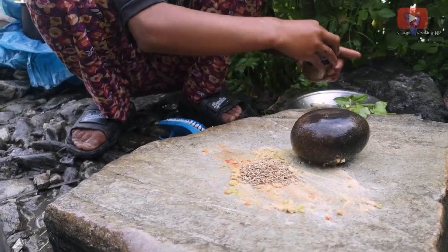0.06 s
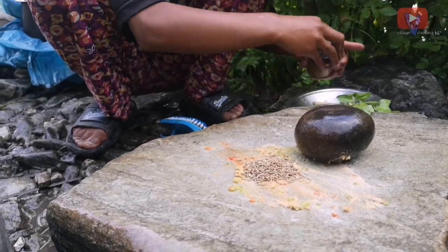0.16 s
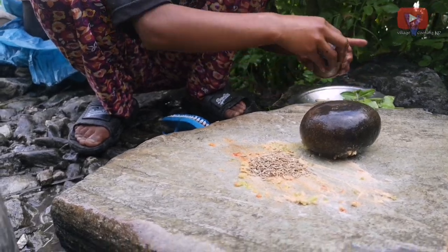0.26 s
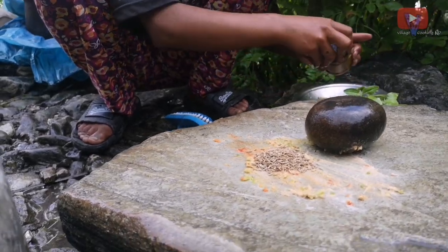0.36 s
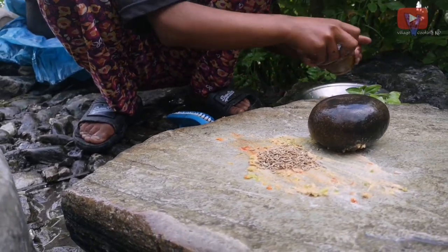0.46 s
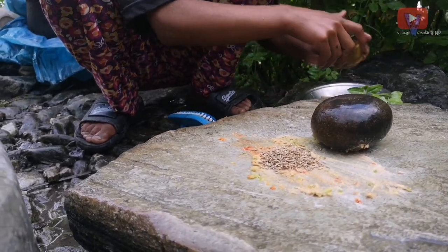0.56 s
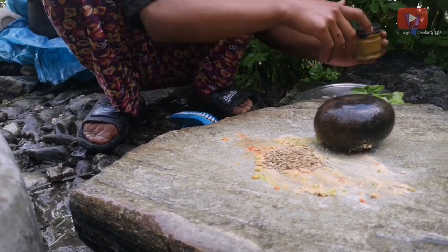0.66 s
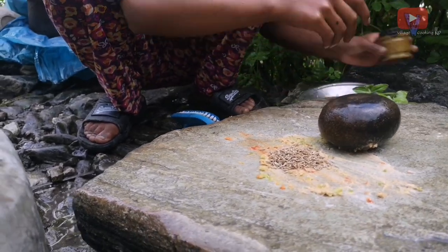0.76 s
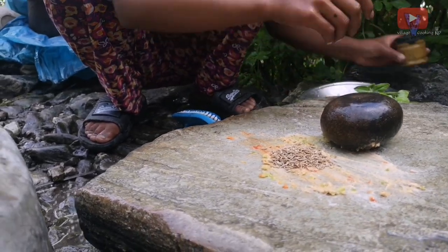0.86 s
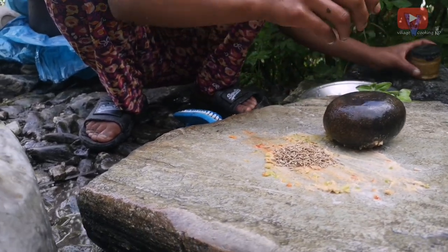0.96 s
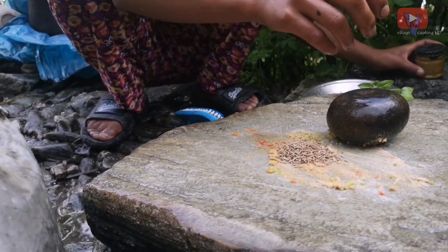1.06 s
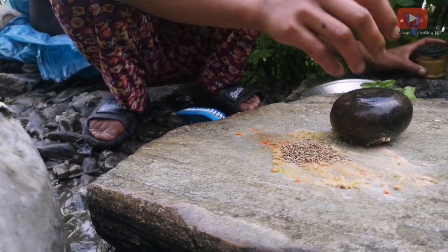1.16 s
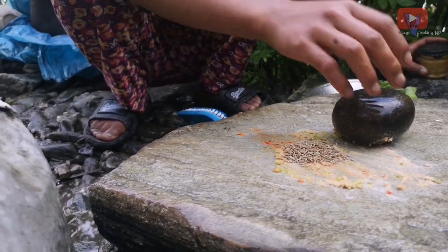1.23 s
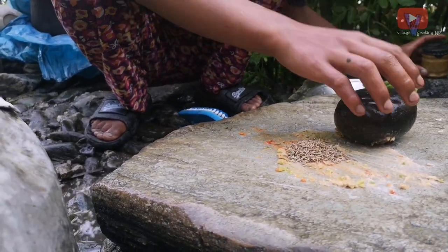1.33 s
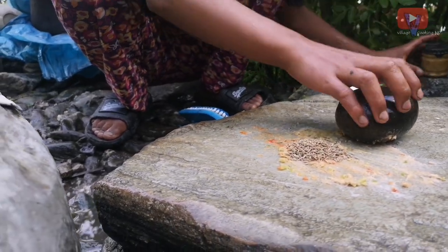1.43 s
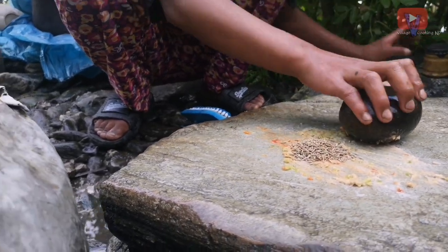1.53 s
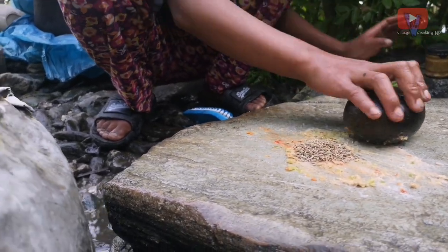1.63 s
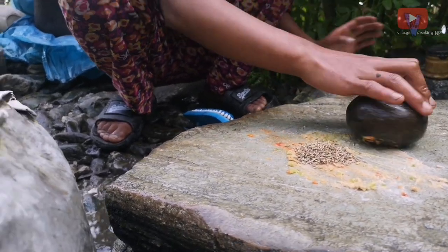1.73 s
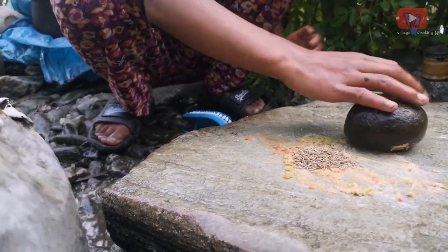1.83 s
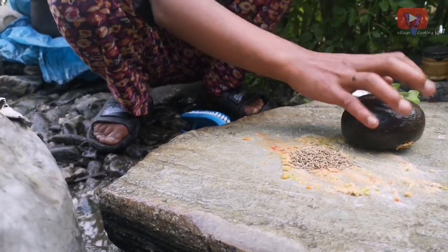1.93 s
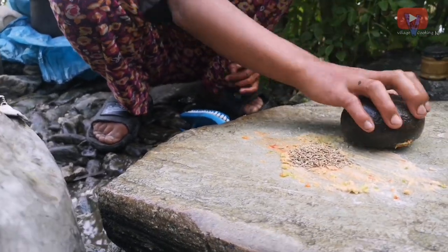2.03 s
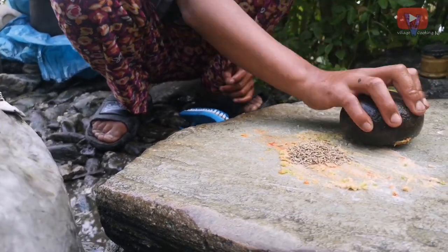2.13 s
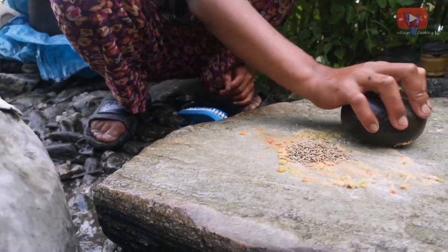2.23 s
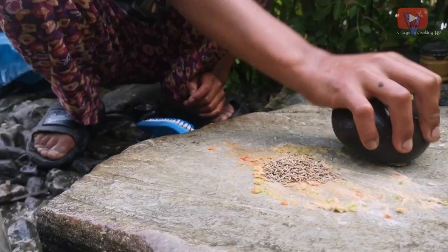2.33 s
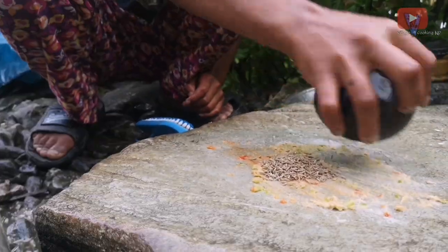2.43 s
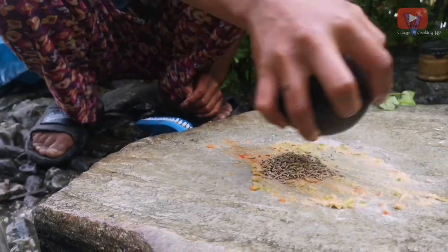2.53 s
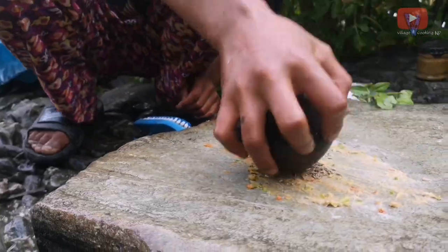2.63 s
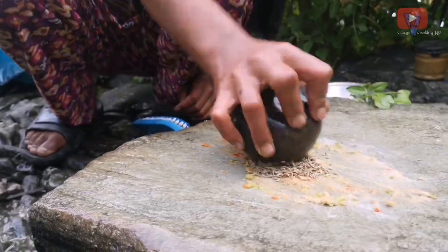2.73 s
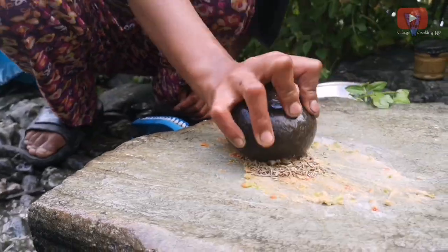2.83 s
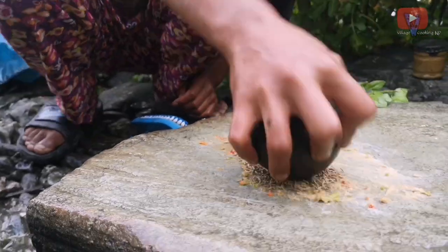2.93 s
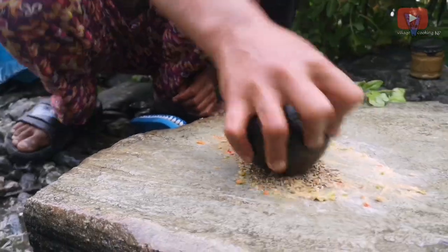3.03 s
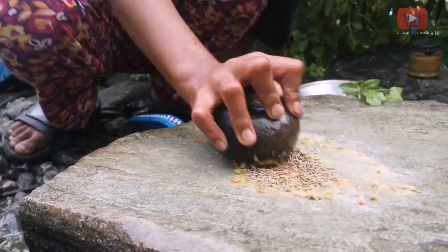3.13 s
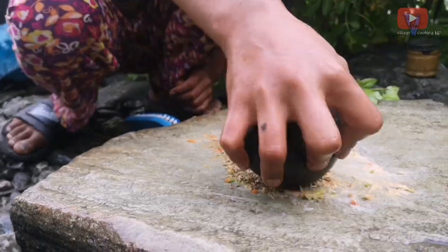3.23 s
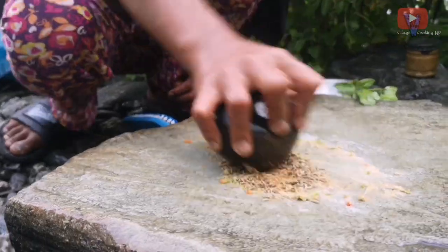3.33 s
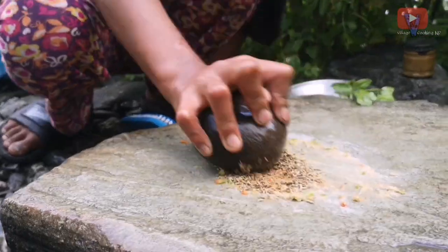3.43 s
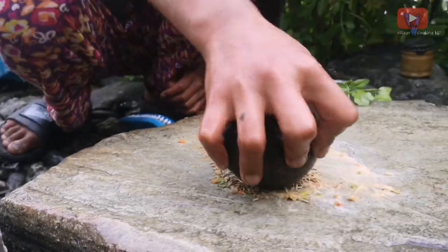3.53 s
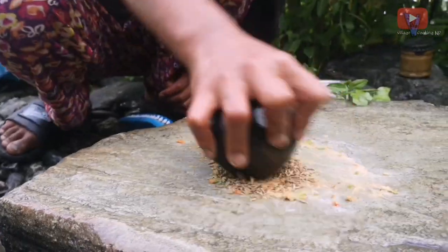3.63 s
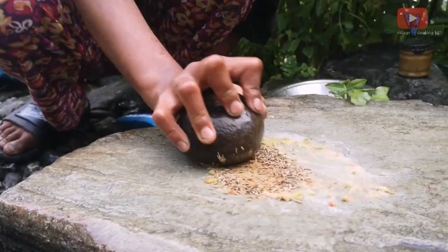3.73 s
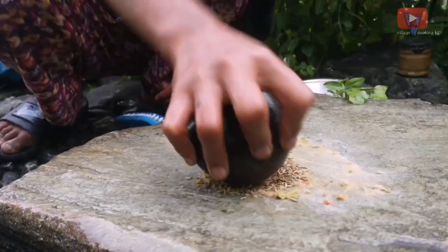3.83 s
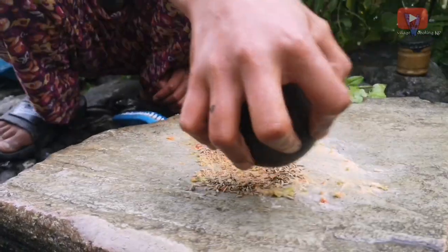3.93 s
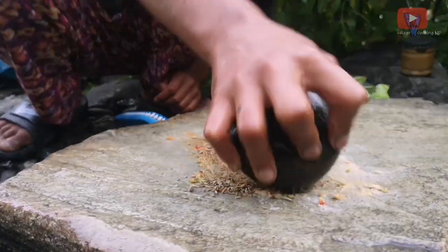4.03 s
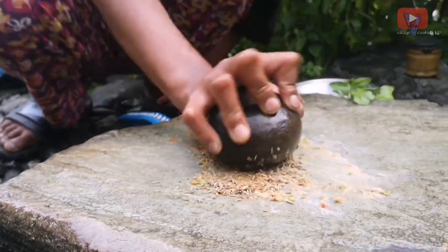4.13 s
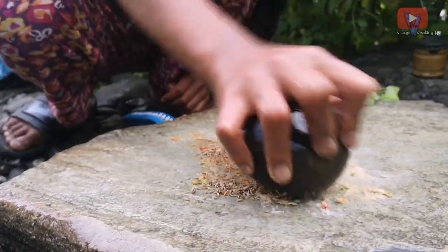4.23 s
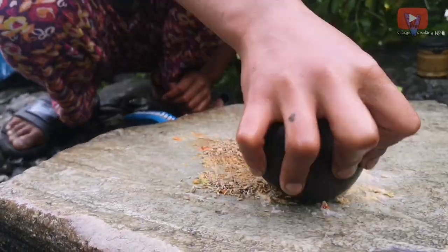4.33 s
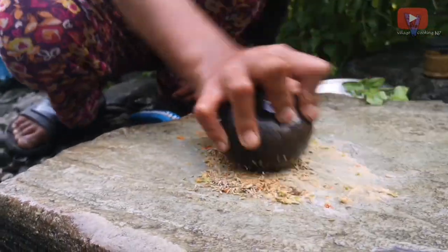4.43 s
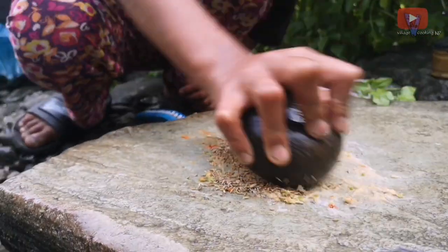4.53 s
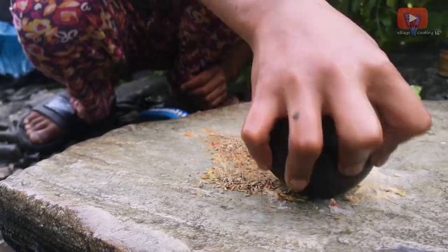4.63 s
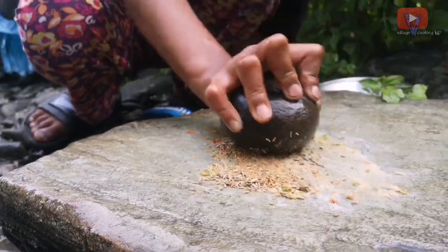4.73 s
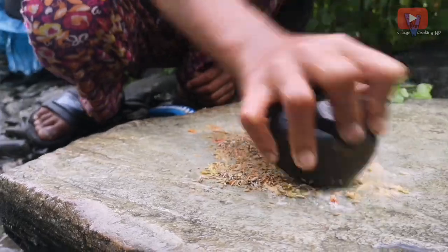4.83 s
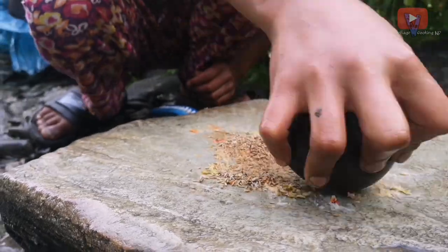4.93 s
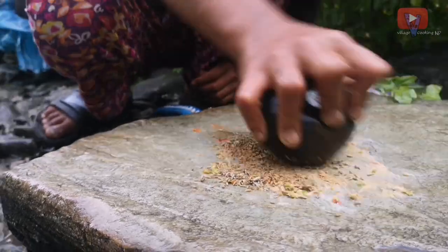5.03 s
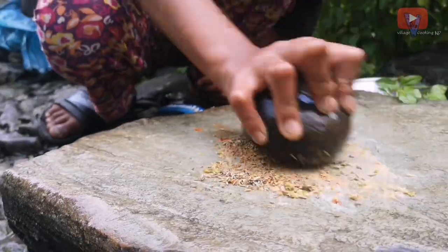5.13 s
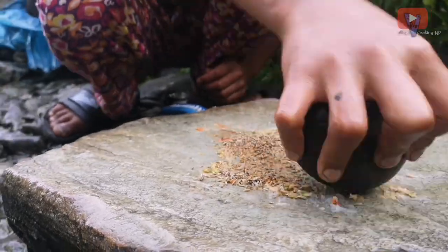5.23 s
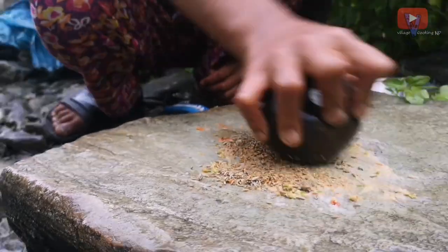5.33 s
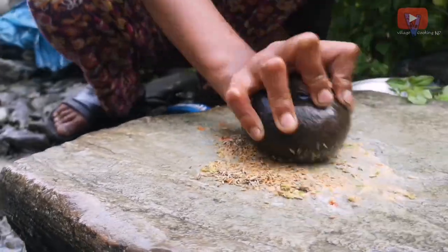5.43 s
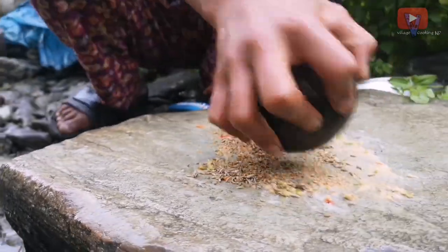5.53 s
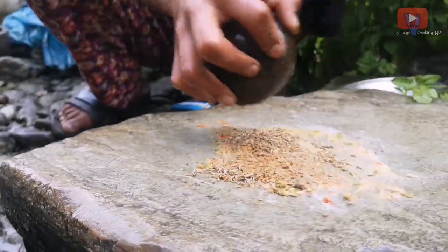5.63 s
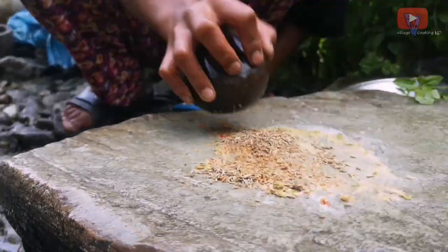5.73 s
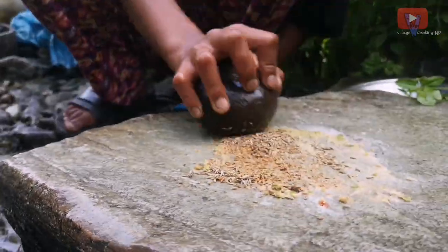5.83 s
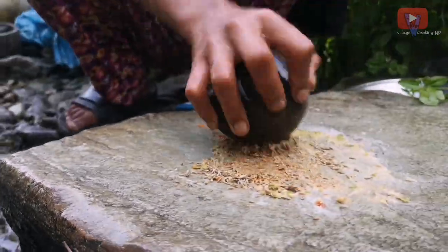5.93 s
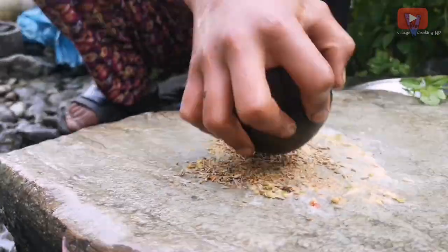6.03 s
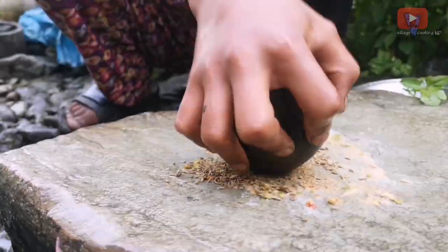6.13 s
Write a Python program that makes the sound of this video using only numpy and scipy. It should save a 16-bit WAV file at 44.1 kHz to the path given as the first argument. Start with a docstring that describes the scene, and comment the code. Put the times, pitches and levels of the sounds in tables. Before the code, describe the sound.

A round stone scrapes back and forth over spices on a stone slab, crunching and thudding, after small knocks and a clucking hen outdoors.

```python
"""Small things knock and a hen clucks in an open yard. After a soft rub of the hand, a round stone scrapes
to and fro over spices on a stone slab, close to a two-port microphone. Grit breaks in a treble fizz,
seeds crack, the rough faces make the slab rumble, and the stone lands with a ringing thud a few times.
Scuffs rasp off to the right; a far dove, a chick, insects and low wind fill the background."""
import sys
import numpy as np
from scipy import signal
from scipy.io import wavfile
from scipy.ndimage import uniform_filter1d

SR = 44100
rng = np.random.default_rng(int(sys.argv[2]) if len(sys.argv) > 2 else 0)


def store_pcm(level_fs):
    """Save levels as 16-bit WAV."""
    pcm = np.round(np.clip(level_fs, -1, 1) * 32767).astype(np.int16)
    wavfile.write(sys.argv[1], SR, np.atleast_2d(pcm).T)


N = 272097

# strokes of the stone: (start [s], stop [s], grit level [dB], crest [share of stroke], rumble offset [dB])
STROKES = [(2.703, 2.736, -39, 0.25, -14), (2.74, 2.903, -38.5, 0.18, -14), (2.865, 2.952, -28, 0.24, -59),
           (3.067, 3.147, -34.5, 0.26, -37), (3.159, 3.265, -27, 0.45, -27),
           (3.358, 3.46, -30, 0.21, -25.5), (3.472, 3.584, -28, 0.45, -25), (3.643, 3.746, -30, 0.33, -28),
           (3.763, 3.868, -27, 0.43, -25), (4.103, 4.201, -24.5, 0.53, -35), (4.2, 4.331, -24, 0.54, -22.5),
           (4.411, 4.52, -24.5, 0.43, -29.5), (4.514, 4.626, -25.5, 0.38, -20),
           (4.687, 4.822, -27.5, .55, -29.5), (4.824, 4.937, -24.5, 0.37, -21),
           (5.011, 5.14, -31.5, 0.52, -24.5), (5.139, 5.256, -28.5, 0.42, -19),
           (5.325, 5.466, -33.5, 0.28, -21), (5.447, 5.569, -28.5, 0.32, -33),
           (5.805, 5.988, -33.5, 0.74, -29), (6.094, 6.192, -38.5, 0.63, -14)]
# flat strokes at first, then peaked: (time [s], power on the speed [exponent])
STROKE_POINTEDNESS = [(3.0, 0.063), (3.8, 0.69), (4.3, 2.9), (5.1, 1.18)]
def pressure(rumble_share=0, lag_s=0, evenness=1):
    """Envelope of the grinding: grit bites once the stone is fast enough, and trickles on after it."""
    bite_speed, steepness, floor = 0.7, 2.44, 0.06  # speed as a share of the top speed
    level = np.zeros(N)
    for start, stop, db, crest, rumble_db in STROKES:
        speed = swell(start + lag_s, stop + lag_s, crest, 0.72)
        bite = floor + speed ** steepness / (speed ** steepness + bite_speed ** steepness)
        shape = bite * speed ** np.interp(start, *np.transpose(STROKE_POINTEDNESS))
        level += amp(db + rumble_share * rumble_db) * shape ** evenness
    decay = np.exp(-1 / (0.013 * SR))  # 13 ms trickle
    return level + amp(-16.5) * signal.lfilter([1 - decay], [1, -decay], level)


# tone of the grit: (frequency [Hz], relative gain [dB])
GRIT_EQ = [(1500, -24), (2500, -26.5), (3200, -23.5), (4450, -13), (5800, -12), (6720, -5.5), (9370, 3.5),
           (14600, -6.5), (15600, -9)]
# how the two ports colour the grit: (frequency [Hz], left over right [dB])
PORT_TILT = [(1500, -5.5), (4500, -7), (7500, -7.5), (9200, 7), (12000, 18), (15000, -6.5)]
# travel of the stone: (time [s], left over right [dB])
STONE_PAN = [(2.8, 0), (3.2, 8.5), (3.8, 9.5), (4.5, 6.5), (5.3, 4), (6.101, 0)]
# seeds splitting with a sharp snap: (time [s], level before panning and EQ [dB])
SEED_SNAPS = [(2.967, -45), (3.371, -30.5), (3.56, -38), (4.143, -33), (4.26, -29), (4.274, -44),
              (4.285, -45), (4.291, -30.5), (4.862, -31.5), (5.21, -39), (5.362, -39), (5.475, -40)]
def grit():
    """Grit breaks in clumps under the stone; each port hears its own colour, partly by other paths."""
    hz = np.fft.rfftfreq(1024, 1 / SR)
    pan_db = np.interp(np.arange(N) / SR, *np.transpose(STONE_PAN))
    clumps = amp(0.28 * wander(120) + wander(700))  # the push catches and slips
    shared = unit_rms(grains(9000, 2.1) + 0.54 * grains(600, 0.48))  # fine grit, coarser seed coats
    snaps, level = np.zeros(N), pressure()
    for s, db in SEED_SNAPS:
        split = unit_rms(rng.standard_normal(120) * signal.windows.hann(120))
        add(snaps[None], s, amp(db) * split)
    crumbs = 0.061 * uniform_filter1d(level, 9000)  # loose crumbs keep rolling between strokes
    ports = []
    for side in (1, -1):  # left, right
        fizz = 0.68 * shared + 0.62 * grains(10000, 1.8)
        fizz *= (level * clumps + crumbs) * amp(side * pan_db / 2)
        taps = eq_taps(curve(GRIT_EQ, hz) + np.minimum(side * curve(PORT_TILT, hz), 0))
        ports.append(signal.oaconvolve(fizz + amp(side * 13) * snaps, taps)[:N])
    return patchy(np.array(ports), patch_db=2)  # the colour wanders as other seeds come under the stone


# ring of cracking seeds: (frequency [Hz], width [Hz], gain [dB])
SEED_MODES = [(3290, 340, 1.5), (4410, 93, -4), (6100, 200, 12)]
def seeds():
    """Whole seeds crack one by one and ring briefly in resonances that shift with the stone."""
    shift = 1 + 0.12 * wander(1500)
    shared, own = (ring_modes(grains(500, 5.5), SEED_MODES, shift) for path in range(2))
    return amp(-19.5) * pressure() * np.array([shared, 0.48 * shared + 0.89 * own])


# body of the slab: (frequency [Hz], width [Hz], gain [dB])
SLAB_MODES = [(83, 51, 8), (129, 45, -0.5), (350.6, 120, 6), (621, 235, -2.5), (890, 265, -13.5)]
def slab_rumble():
    """The rough faces bump and shake the heavy slab, which answers a little late."""
    shift = 1 + 0.042 * wander(3000)  # the ring shifts as the stone moves over the slab
    shared, left, right = (ring_modes(grains(500, 3.8), SLAB_MODES, shift) for path in range(3))
    level = pressure(rumble_share=0.97, lag_s=0.0087, evenness=0.64)
    return (shared + 0.29 * np.array([left, right])) * level * pan(-2.4)


def spice_shuffle():
    """Heaped spices are pushed about: a duller scrape that lingers between the strokes."""
    scrape = np.array([resonate(grains(2800, 21.0), hz=1780, width=5600) for port in range(2)])
    return amp(-34.5) * uniform_filter1d(pressure(), 7000) * unit_rms(scrape)


# ring of the hand stone: (frequency [Hz], width [Hz], gain [dB])
STONE_MODES = [(353, 120, 7), (640, 290, 6.5), (1077, 310, 2.5), (2690, 110, -11), (3580, 170, -12.5)]
# stone hits slab: (time [s], level [dB], tick offset [dB], hardness [dB/octave], thud offset [dB])
LANDINGS = [(4.073, -26, -13, 0.5, 11), (5.864, -22.5, -19, -1.5, 6), (6.153, -31.5, -11, -15, 9)]
def stone_landings():
    """Grit ticks as the stone meets the spices; 3 ms later the blow rings the stone and thuds the slab."""
    out, blow = np.zeros((2, N)), signal.unit_impulse(5000, 130)
    t = np.arange(len(blow)) / SR
    for s, db, tick_db, hardness, thud_db in LANDINGS:
        body = amp(thud_db) * unit_rms(steep_band(blow, hz=107, width=104))
        for k, (hz, width, mode_db) in enumerate(STONE_MODES):
            gain = (-1) ** k * amp(mode_db + hardness * np.log2(hz / 370))
            body += gain * unit_rms(steep_band(blow, hz, width))
        tick = np.diff(rng.standard_normal((2, len(t) + 1))) * amp(tick_db - 60 * t / 0.041)
        add(out, s, amp(db) * (body / abs(body).max() + 2.6 * tick), pan_db=-3.5)
    return out


def stone_skid():
    """The stone drags as it lifts: grit excites its two high modes, which rise and sink a little."""
    drag = dict(start=5.6, stop=5.72, crest=0.3)
    shift = 1 + 0.037 * (swell(**drag, pointedness=0.83) - 0.5)
    ring = np.array([ring_modes(grains(620, 1.6), STONE_MODES[-2:], shift) for port in range(2)])
    return amp(-58) * swell(**drag, pointedness=0.21) * ring


# knocks and ticks: (time [s], level [dB], pitch [Hz], second tone [ratio], treble offset [dB],
# decay to -60 dB [s], hollowness [0-1])
KNOCKS = [(.129, -20, 877, 1.85, -1.5, 0.025, 0.78), (0.147, -42.5, 720, 1.74, 4.5, 0.14, 0.27),
          (0.209, -43.5, 508, 1.75, -2, 0.18, 0.25), (0.229, -35, 850, 1.8, -0.5, 0.053, 0.35),
          (.25, -30.5, 444, 2, -0.5, 0.043, 0.15), (0.486, -37, 1340, 0.18, -20, 0.022, 0.2),
          (0.545, -40.5, 1240, 2.2, 7.5, 0.035, 0.13), (0.715, -53.5, 1820, 1.5, -15, 0.16, 0),
          (.736, -37, 1215, 1.37, -24, 0.029, 0.22), (1.104, -51.5, 1310, 1.66, 3.5, 0.14, 0.1),
          (1.174, -20.5, 580, 1.56, 4.5, 0.032, 0.37), (1.19, -34, 584, 1.9, -1, 0.054, 0.17),
          (2.576, -58, 2400, 1.7, 20, 0.032, 0.8), (2.703, -42.5, 253, 1.54, -30, 0.13, 0.74),
          (2.965, -41, 2870, 1.4, -15, 0.018, 0.6), (5.604, -29, 795, 0.34, -22, 0.024, 0.47)]
# treble clack of the knocks: (frequency [Hz], width [Hz], gain [dB])
CLACK_MODES = [(4600, 1850, -0.5), (6610, 1420, 5), (8000, 4700, 8.5), (9540, 90, -2.5), (11000, 610, -9)]
def knocks():
    """Hollow things ring in two tones, dry ones clatter; a tick sits on top and crumbs scatter after."""
    out, t = np.zeros((2, N)), np.arange(4000) / SR
    attack = np.minimum(t / 0.0018, 1)
    for s, db, hz, ratio, treble_db, t60, hollow in KNOCKS:
        noise, left, right = rng.standard_normal((3, len(t)))
        first_tone = np.sin(2 * np.pi * hz * t) * np.tanh(t / 0.0054)
        second_tone = 0.5 * np.sin(2 * np.pi * ratio * hz * t) * amp(-40 * t / t60)
        modes = [(hz, 0.92 * hz, 0), (ratio * hz, 0.94 * hz, -2),
                 (2.5 * hz, 1.2 * hz, -6), (3.74 * hz, hz, -12)]
        clatter = ring_modes(noise, modes)
        body = 2 * hollow * (first_tone + second_tone) + 0.81 * (1 - hollow) * clatter
        clack = ring_modes(np.array([left, 0.01 * left + 0.46 * right]), CLACK_MODES)
        tick = amp(treble_db - 30 * t / t60) * clack
        hit = (body + tick) * attack * amp(-60 * t / t60)
        scatter = amp(treble_db - 16 - 60 * t / 0.14) * clack[:, ::-1]
        add(out, s, amp(db) * (hit + scatter), pan_db=-5.5)
    return out


# rough scuffs: (start [s], length [s], rasp level [dB], thump level [dB], thump pitch [Hz],
# ground boom over thump [dB], gravel tuning [ratio], fall of that tuning [share])
SCUFFS = [(2.715, 0.15, -41.5, -46, 250, 2, 0.97, 0.15), (2.963, 0.1, -57, -79, 290, -2, 1.2, 0.094),
          (5.294, 0.34, -44.5, -55.5, 368, -23, 1.047, 0.03),
          (5.546, 0.25, -59.5, -68, 390, -9, 0.69, 0.11), (6.112, 0.074, -51.5, -40, 160, -25, 0.98, 0.11)]
# rasp of gravel: (frequency [Hz], width [Hz], gain [dB])
GRAVEL_MODES = [(543, 113, 9.5), (1030, 265, 9), (1620, 290, 8), (1940, 380, 13), (2565, 390, 9),
                (3940, 480, 5)]
def scuffs():
    """As of feet shifting on gravel: a low thump first, then a rasp with sinking resonances."""
    start, length, rasp_db, thump_db, thump_hz, boom_db, tuning, fall = np.transpose(SCUFFS)
    t = np.arange(N) / SR
    now = np.clip(np.searchsorted(start, t) - 1, 0, None)  # the latest scuff at each sample
    progress = np.clip((t - start[now]) / length[now], 0, 1)
    shift = tuning[now] * (1 + fall[now] * (0.5 - progress)) * (1 + 0.037 * wander(900))
    rasp_level = sum(amp(db) * swell(s + 0.099 * span, s + span, 0.54, 0.76)
                     for s, span, db in zip(start, length, rasp_db))
    thump_level = sum(amp(db) * swell(s, s + span, 0.11, 0.73)
                      for s, span, db in zip(start, length, thump_db))
    bumps = grains(700, 1.5)
    thump = unit_rms(resonate(resonate(bumps, thump_hz[now], 200), thump_hz[now], 135))
    boom = amp(boom_db[now]) * unit_rms(resonate(resonate(bumps, 59, 69), 67, 68))
    shared, left, right = (ring_modes(grains(4000, 0.62), GRAVEL_MODES, shift) for path in range(3))
    rasp = 0.98 * shared + 0.81 * np.array([left, right])
    return (rasp_level * rasp + thump_level * (thump + boom)) * pan(-3)


# rubs of the hand: (start [s], stop [s], level [dB], crest [share of rub], pointedness [exponent],
# centre [Hz], width [Hz])
HAND_RUBS = [(1.81, 2.177, -59.5, 0.35, 0.33, 12700, 3000), (1.843, 2.17, -50, 0.48, 2.6, 7840, 3900)]
def hand_rub():
    """Soft bright friction of the hand on the stone."""
    out = np.zeros((2, N))
    for start, stop, db, crest, pointedness, hz, width in HAND_RUBS:
        fizz = np.array([steep_band(grains(8500, 4.0), hz, width) for port in range(2)])
        out += amp(db) * swell(start, stop, crest, pointedness) * unit_rms(fizz)
    return out * pan(5)


# clucks, low notes leading into higher ones: (time [s], level [dB], pitch [Hz])
CLUCKS = [(0.529, -42, 335), (0.57, -44.5, 427), (0.943, -42, 380), (0.972, -48, 423), (1.347, -47, 443),
          (1.672, -49, 303), (1.707, -39, 430), (2, -45, 333), (2.064, -48, 278), (2.105, -37, 430.6)]
def hen():
    """A jittery buzz and pulsing breath make short hoarse notes through a throat near 870 Hz."""
    out, t = np.zeros((2, N)), np.arange(6000) / SR
    envelope = np.minimum(t / 0.015, 1) * amp(-60 * t / 0.15)
    for s, db, hz in CLUCKS:
        jitter, breath = rng.standard_normal((2, len(t)))
        phase = 2 * np.pi * np.cumsum(hz * (1 + 0.38 * uniform_filter1d(jitter, 150))) / SR
        buzz = unit_rms(sum(np.sin(k * phase) for k in range(1, 5)))
        voice = buzz + 2.4 * breath * (1 + np.cos(phase))
        throat = resonate(resonate(voice, 760, 440), 865, 170)
        note = unit_rms(throat + 0.42 * resonate(voice, hz, 210))
        add(out, s, amp(db) * envelope * note, pan_db=-3)
    return out


# coos: (time [s], level [dB])
COOS = [(.12, -72), (1.04, -70), (2.03, -68), (2.8, -72), (3.8, -69)]
def dove():
    """A far dove whistles notes whose pitch arches over a 1340 Hz crest."""
    out = np.zeros((2, N))
    arch_hz = 1340 - 620 * (np.linspace(0, 1, round(0.31 * SR)) - 0.4) ** 2
    for s, db in COOS:
        add(out, s, whistle(arch_hz, db, jitter=0.0055))
    return out


# peeps: (time [s], length [s], level [dB])
PEEPS = [(.008, .11, -57), (1.27, .07, -66), (4.995, .045, -63)]
def chick():
    """A chick whistles thin falling peeps."""
    out = np.zeros((2, N))
    for s, length, db in PEEPS:
        fall_hz = np.linspace(4400, 3500, round(length * SR))
        add(out, s, whistle(fall_hz, db, jitter=0.02))
    return out


# insect voices: (centre [Hz], width [Hz], starting level [dB])
INSECT_BANDS = [(6100, 360, -63.5), (7570, 140, -66.5), (11600, 30, -76)]
def insects():
    """A far chorus: fuzzy bands that waver slightly and grow by 0.1 dB a second."""
    out, rise_db = np.zeros((2, N)), 0.1 * np.arange(N) / SR
    for hz, width, db in INSECT_BANDS:
        level = amp(db + 0.22 * wander(9000) + rise_db)
        out += level * unit_rms(steep_band(rng.standard_normal((2, N)), hz, width))
    return out


# tone of the outdoor bed: (frequency [Hz], relative gain [dB])
YARD_EQ = [(20, -10), (62, 0), (113, -11.5), (181, -12), (493, -18.5), (651, -24), (885, -21),
           (1170, -26.5), (6580, -23), (7560, -16), (11500, -32.5), (15600, -34.5)]
# its stereo width: (frequency [Hz], left-right correlation [-1 to 1])
YARD_CORRELATION = [(60, 1), (380, 0.66), (2380, -0.27), (15000, 0.15)]
# its balance: (frequency [Hz], left over right [dB])
YARD_PAN = [(60, 0), (380, -2.5), (2380, -2), (15000, 5.5)]
def yard_air():
    """Low murmur of wind and far hiss, with drifting louder and softer patches."""
    frames, hz = N // 256 + 5, np.fft.rfftfreq(1024, 1 / SR)
    left_re, left_im, own_re, own_im, patches = rng.standard_normal((frames, 513, 5)).T
    patches = unit_rms(uniform_filter1d(uniform_filter1d(patches, 12, 0, mode="wrap"), 14, 1))
    likeness = curve(YARD_CORRELATION, hz)[:, None]
    lean = amp(curve(YARD_PAN, hz)[:, None] / 2)
    left = left_re + 1j * left_im
    right = likeness * left + np.sqrt(1 - likeness ** 2) * (own_re + 1j * own_im)
    spectrum = np.array([left * lean, right / lean]) * amp(curve(YARD_EQ, hz)[:, None] + 2.4 * patches)
    return amp(-54) * unit_rms(signal.istft(spectrum, nperseg=1024, noverlap=768)[1][:, :N])


def whistle(hz, db, jitter):
    """A near-sine note that wavers with distance."""
    waver = 1 + 0.5 * wander(500, (2, len(hz)))
    phase = 2 * np.pi * np.cumsum(hz * (1 + jitter * wander(200, len(hz)))) / SR
    note = np.sin(phase + np.array([[0], [1.3]]))
    return amp(db) * note * waver * signal.windows.tukey(len(hz), 0.4)


def swell(start, stop, crest, pointedness):
    """Envelope of one movement: speed rises from rest, crests and returns to rest."""
    progress = np.clip((np.arange(N) / SR - start) / (stop - start), 0, 1)
    skew = np.log(0.5) / np.log(crest)
    return np.sin(np.pi * progress ** skew).clip(0) ** pointedness


def grains(per_s, spread_db):
    """Random clicks of either sign, a few of them large."""
    size = amp(spread_db * np.minimum(rng.exponential(1, N), 5)) * rng.choice([-1., 1.], N)
    return unit_rms(size * (rng.random(N) < per_s / SR))


def wander(samples, shape=N):
    """Random drift, smoothed over this many samples."""
    return unit_rms(uniform_filter1d(rng.standard_normal(shape), samples))


def patchy(x, patch_db):
    """Raises or lowers random patches of about 1.5 kHz by 25 ms."""
    spectrum = signal.stft(x, nperseg=256, noverlap=192)[2]
    field = rng.standard_normal(spectrum.shape[:0:-1]).T
    field = unit_rms(uniform_filter1d(uniform_filter1d(field, size=9, axis=0), size=17, axis=1))
    return signal.istft(spectrum * amp(patch_db * field), nperseg=256, noverlap=192)[1][:, :N]


def resonate(x, hz, width):
    """A resonance that can glide: shifts hz down to zero, smooths, and shifts back."""
    carrier = np.exp(2j * np.pi * np.cumsum(hz * np.ones(x.shape[-1])) / SR)
    pole = np.exp(-np.pi * width / SR)
    return 2 * (carrier * signal.lfilter([1 - pole], [1, -pole], x / carrier)).real


def steep_band(x, hz, width):
    return resonate(resonate(x, hz, width), hz, width)


def ring_modes(x, modes, shift=1):
    """A bank of steep resonances, all tuned by one factor."""
    return unit_rms(sum(amp(db) * steep_band(x, hz * shift, width) for hz, width, db in modes))


def eq_taps(db):
    """Causal filter of energy 1, shaped by the gains db on an rfft grid."""
    log_gain = np.log(amp(np.r_[db, db[-2:0:-1]]))
    taps = np.fft.ifft(np.exp(np.conj(signal.hilbert(log_gain)))).real[:len(db)]
    return taps / np.linalg.norm(taps)


def curve(points, hz):
    """Interpolates a table along log frequency."""
    point_hz, value = np.transpose(points)
    return np.interp(np.log(hz + 1), np.log(point_hz + 1), value)


def add(mix, s, sound, pan_db=0):
    """Mixes a sound in at s seconds."""
    part = mix[:, round(s * SR):][:, :np.shape(sound)[-1]]
    part += (sound * pan(pan_db))[:len(mix), :part.shape[1]]


def pan(left_over_right_db):
    return amp([[left_over_right_db / 2], [-left_over_right_db / 2]])


def amp(db):
    return 10 ** (np.asarray(db) / 20)


def unit_rms(x):
    return x / np.sqrt(np.mean(x ** 2) + 1e-20)


def scene():
    """The grinding and the yard around it, in stereo."""
    off_right = scuffs() + hen()
    off_right[0] = np.r_[np.zeros(17), off_right[0, :-17]]  # these reach the left port 17 samples late
    foreground = grit() + seeds() + slab_rumble() + stone_landings() + knocks()
    background = dove() + chick() + yard_air() + insects()
    soft_friction = hand_rub() + spice_shuffle() + stone_skid()
    return foreground + soft_friction + off_right + background


def record(dry):
    """A steep low-pass cuts the treble above 15.3 kHz."""
    return signal.oaconvolve(dry, signal.firwin(511, 15300, window=("kaiser", 9), fs=SR)[None], "same")


dry = scene()
out = record(dry)
store_pcm(out)
```